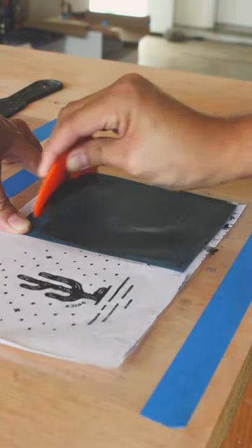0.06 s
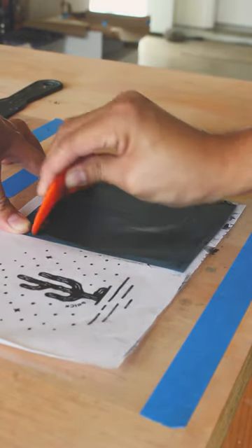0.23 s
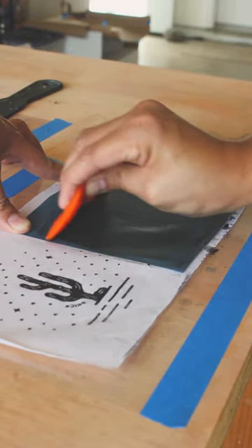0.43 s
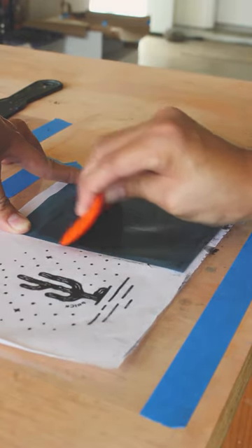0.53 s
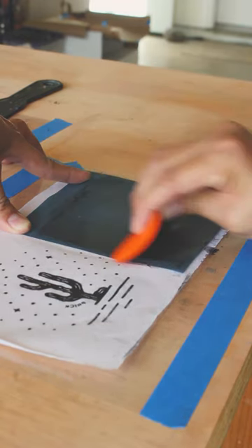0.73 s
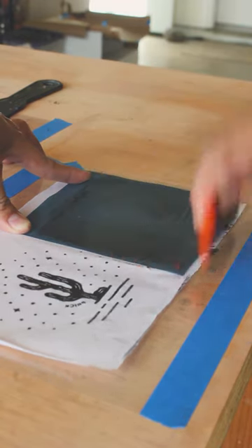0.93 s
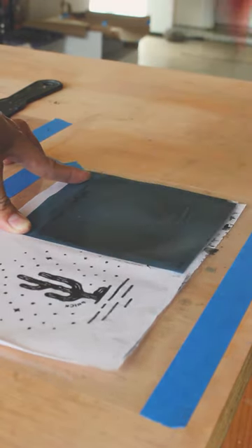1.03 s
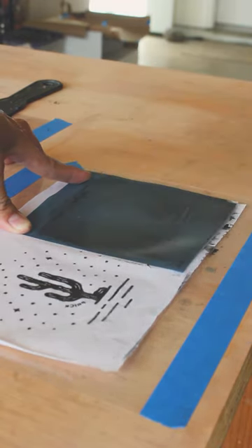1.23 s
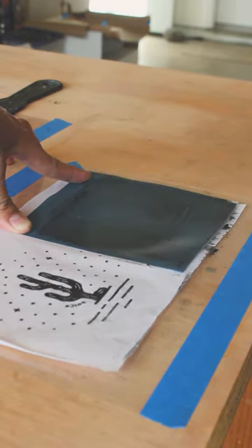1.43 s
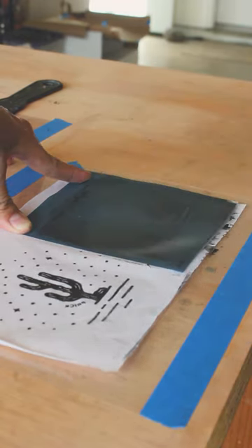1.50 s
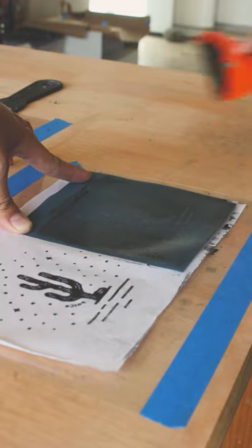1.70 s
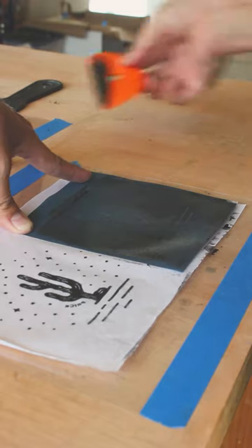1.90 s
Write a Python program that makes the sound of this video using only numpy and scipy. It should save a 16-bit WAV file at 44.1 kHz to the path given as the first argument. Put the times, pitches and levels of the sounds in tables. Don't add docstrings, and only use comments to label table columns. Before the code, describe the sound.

Short gritty scrape of a plastic blade over inky mesh, swelling to a tiny squeak and a hard wooden crack, heard close in a workshop with low hum, faint birdsong and later a small distant clatter.

```python
import sys
import numpy as np
from scipy import signal
from scipy.fft import rfft, irfft, next_fast_len
from scipy.io import wavfile
from scipy.ndimage import uniform_filter1d, map_coordinates

SR = 44100
rng = np.random.default_rng(int(sys.argv[2]) if len(sys.argv) > 2 else 0)


def nominal_scale(level):
    x = np.asarray(level, float) / 20
    return 10 ** x


def wrap_up_sound(samples):
    columns = np.atleast_2d(samples).T
    tamed = np.clip(columns, -1, 1)
    steps = np.round(tamed * 32767).astype(np.int16)
    wavfile.write(sys.argv[1], SR, steps)


N = 85995
SET_DOWN_S, LIFT_S = .2198, .9482

# t/s, level/dB
DRAG = [
    (.36, -71),
    (.462, -54),
    (.474, -47),
    (.49, -55),
    (.58, -48.5),
    (.68, -49),
    (.74, -44.5),
    (.925, -46.5),
    (.948, -38.5),
]
# f/Hz, level/dB per Hz
MESH = [(120, -41), (200, -8), (500, -8.5), (900, -1), (1500, 0.5), (3300, -1), (5000, -8), (8000, -44)]
# f/Hz, width/Hz, level/dB
BLADE = [(185, 25, -13), (828, 18, 1), (1014, 42, 4.5), (1104, 32, 15), (1763, 23, 6.5), (2050, 32, 10),
         (2520, 51, -16)]
# f/Hz, level/dB per Hz
FIZZ = [(2500, -24), (4500, -5), (7000, 6.5), (9000, 1.5), (12500, 6.5), (16000, 1)]
# f/Hz, level/dB per Hz
SLIDE = [(200, -53), (330, -3), (500, 0), (750, 0.5), (1000, -5), (1600, -45)]
# f/Hz, level/dB, t60/s
TABLE_HARD = [(177.4, -19.5, 0.36), (276, -29, 0.14), (384, -14, 0.14), (518, -12, 0.032),
              (622, -13.5, 0.073), (814, -13, 0.09), (966, -12.5, 0.046), (1416, -21, 0.11),
              (1717, -9.5, 0.026), (2368, -14, 0.038)]
# f/Hz, level/dB per Hz
CRACK = [(180, -41), (300, 4), (1010, 0), (1890, 4.5), (3490, 4.5), (5120, -8), (10300, -5.5), (14500, -43),
         (15800, -25)]
# f/Hz, level/dB, t60/s
SNAP = [(3550, -11, 0.0042), (990, -18, 0.014), (7140, -20.5, 0.0045)]
# f/Hz, level/dB per Hz
CLACK = [(100, -6.5), (200, -3.5), (400, -4), (817, -1), (1590, -11.5), (3880, -17.5), (5000, -24.5),
         (15800, -49)]
# f/Hz, level/dB, t60/s
TABLE_SOFT = [(156, -1, 0.19), (179, -2, 0.25), (240, -8.5, 0.11), (298.5, -3, .17), (380, -5.5, 0.086),
              (490, -8.5, 0.086), (593, -15, 0.078), (740, -10, 0.059), (1000, -21, 0.023)]
# f/Hz, level/dB per Hz
THUD = [(59, -33), (100, -11), (213, 22), (1160, -19), (1290, -37), (2500, -49), (3250, -74), (5500, -120)]
# t/s, peak level/dB, centre f/Hz
TICKS = [(.053, -52, 14000), (.219, -36, 7500), (.233, -46, 8000), (.2865, -50, 12000), (.356, -45, 9000),
         (.427, -48, 12000), (.474, -42, 10700), (.4995, -42.5, 7000), (.5305, -35, 8500),
         (.548, -45, 9000), (.561, -43, 12500), (.569, -37, 12000), (.622, -41, 12000), (.628, -40, 9000),
         (.634, -42, 12500), (.679, -42, 7000), (.742, -39, 13500), (.761, -42, 11000), (.782, -42, 8000),
         (.816, -38, 9000), (.835, -40, 14000), (.843, -37, 11500), (1.0172, -38, 13100),
         (1.023, -47, 13100), (1.062, -46, 12300), (1.1275, -44, 13000), (1.14, -48, 13000),
         (1.378, -51, 7000), (1.412, -46, 7000)]
# f/Hz, level/dB per Hz
CLATTER = [(200, -16), (400, -5), (708, -7), (1210, -6.5), (2260, -9), (3940, -13), (10500, -21),
           (12500, -26)]
# f/Hz, width/Hz, level/dB
CLATTER_RING = [(722, 105, -2.5), (1750, 60, -7), (2240, 50, -1), (3950, 260, -3), (4550, 120, -13),
                (5100, 160, -5)]
# t/s, half length/s, level/dB
RUSTLES = [
    (1.42, .035, -58),
    (1.572, .015, -59),
    (.285, .012, -62),
    (.095, .03, -63),
    (.185, .03, -62),
]
# f/Hz, level/dB per Hz
RUSTLE = [(700, -25), (1500, -34), (3300, 16), (6000, 2), (16000, -45)]
# t/s, length/s, from f/Hz, to f/Hz, level/dB
WHISTLES = [(.433, .03, 4280, 4290, -61), (.458, .036, 4290, 4260, -55), (.49, .036, 4270, 4250, -62),
            (.527, .044, 4310, 4230, -59), (.566, .05, 4230, 4110, -50), (.612, .058, 4085, 3995, -52),
            (.662, .056, 3998, 3930, -48), (1.08, .03, 4080, 4120, -68), (1.215, .035, 4170, 4220, -66),
            (1.275, .05, 4200, 4190, -63), (1.658, .045, 5200, 4750, -53), (1.69, .028, 5200, 4850, -55),
            (1.7, .022, 4780, 4520, -58), (1.718, .034, 4500, 4400, -61), (1.746, .022, 4400, 4380, -50),
            (1.775, .125, 4420, 4420, -67), (1.8, .03, 4170, 4120, -63), (1.836, .03, 4140, 4080, -62),
            (1.876, .026, 4030, 3930, -63), (1.904, .03, 3920, 3820, -63), (1.772, .026, 3560, 3330, -60),
            (1.8, .022, 3330, 3290, -66), (1.826, .056, 3270, 3120, -61), (1.715, .05, 5120, 5050, -69)]
# t/s, length/s, from f/Hz, to f/Hz, level/dB
CHIRPS = [(.072, .022, 3100, 3700, -60), (.16, .04, 3450, 3750, -66), (.256, .02, 3500, 3900, -55),
          (.272, .022, 2900, 2800, -60), (.356, .024, 3550, 4050, -54), (.385, .016, 3600, 3950, -58),
          (.478, .02, 3800, 3980, -55), (.493, .02, 3950, 3750, -51), (.515, .016, 3900, 3700, -55),
          (1.018, .02, 3350, 3720, -57), (1.036, .028, 3850, 4170, -51.5), (1.4, .025, 3900, 3100, -65),
          (1.425, .024, 4280, 4750, -53), (1.748, .02, 4150, 3850, -50), (1.762, .016, 3850, 3550, -60),
          (1.768, .014, 4050, 3900, -56), (.09, .016, 2950, 2800, -63), (.15, .022, 3250, 3350, -64),
          (.172, .02, 4500, 4500, -65), (.18, .024, 4850, 4850, -65), (1.56, .025, 5100, 5050, -70)]
# f/Hz, level/dB per Hz
HUM = [(15, -58), (25, -42), (54, 2.5), (172, 0), (206, -3.5), (243, -10), (317, -12), (400, -21.5),
       (520, -45), (880, -120)]
# f/Hz, level/dB per Hz
AIR = [(150, -26), (250, 1), (483, -3), (746, -4), (887, -1.5), (1470, -8.5), (1740, -10.5), (2040, -13),
       (15800, -24)]
# f/Hz, t60/s
NEAR_ROOM = [(200, 0.35), (1000, .25), (4000, 0.36), (15000, 0.24)]
# f/Hz, t60/s
FAR_ROOM = [(300, .17), (2000, .4), (6000, .36), (15000, .3)]


def drag():
    t = np.arange(N) / SR
    effort_db = np.interp(t, *np.transpose(DRAG), left=-120, right=-120)
    rub = mesh_grains()
    return blade_scrape(rub, effort_db) + ink_fizz(rub, effort_db) + squeak() + screen_creep(effort_db)


def mesh_grains(grains_per_s=5000, scatter_db=2.5, share=.5):
    hits = rng.random(N) < grains_per_s / SR
    strength = rng.standard_normal(N) * nominal_scale(scatter_db * rng.exponential(size=N))
    return np.sqrt(share) * unit(hits * strength) + np.sqrt(1 - share) * rng.standard_normal(N)


def blade_scrape(rub, effort_db):
    def colour(hz):
        return nominal_scale(along(MESH, hz)) * resonant(BLADE, hz)

    uneven = rub * nominal_scale(effort_db + 0.37 * wobble(25.8))
    return filtered(uneven, colour) / np.std(filtered(rub, colour))


def ink_fizz(rub, effort_db, level_db=-1.5, growth=1.6, patchy_db=1.8, fade_t60_s=.08):
    t = np.arange(N) / SR
    top_db = np.max(effort_db)
    trail_db = np.interp(t, *np.transpose(DRAG), left=-120)
    trail_db = trail_db - 60 * np.maximum(t - LIFT_S, 0) / fade_t60_s
    z = signal.stft(rub, nperseg=256)[2]
    patches = uniform_filter1d(rng.standard_normal(z.shape), 7, 0)
    patches = uniform_filter1d(patches, 9, 1)
    patchy = signal.istft(z * nominal_scale(patchy_db * unit(patches)), nperseg=256)[1][:N]
    return unit(coloured(patchy, FIZZ)) * nominal_scale(top_db + level_db + growth * (trail_db - top_db))


def squeak(length_s=.03, from_hz=1740, rise_hz=480, level_db=-40):
    t = np.arange(N) / SR
    u = np.clip((t - LIFT_S) / length_s + 1, 0, 1)
    phase = 2 * np.pi * np.cumsum(from_hz + rise_hz * u ** 3) / SR
    return nominal_scale(level_db + 0.88 * wobble(250)) * u * (u < 1) * np.sin(phase)


def screen_creep(effort_db, level_db=-15, growth=0.05, wobble_db=1.2):
    top_db = np.max(effort_db)
    creep = noise(SLIDE) * (effort_db > -119)
    return creep * nominal_scale(top_db + level_db + growth * (effort_db - top_db) + wobble_db * wobble(29.9))


def knocks():
    return snap_off() + set_down() + shudder()


def snap_off(knock_db=-15.5, crack_db=-20, clack_db=-1.5, delay_s=.0003, hold_s=.0002, crack_t60_s=.005):
    t = np.arange(2000) / SR
    crack = noise(CRACK, len(t)) * nominal_scale(crack_db - 60 * np.maximum(t - hold_s, 0) / crack_t60_s)
    knock = nominal_scale(knock_db) * placed(ring(TABLE_HARD, 0.74), LIFT_S)
    spring = placed(ring(SNAP, 0.28), LIFT_S + delay_s)
    clack = nominal_scale(clack_db) * answer(LIFT_S, CLACK, .001)
    return knock + placed(crack, LIFT_S + delay_s) + spring + clack


def set_down(knock_db=-30, thud_db=-27):
    knock = nominal_scale(knock_db) * placed(ring(TABLE_SOFT, 0.49), SET_DOWN_S)
    return knock + nominal_scale(thud_db) * answer(SET_DOWN_S, THUD, 0.00035)


def shudder(centre_s=.892, half_length_s=.028, f_hz=186, level_db=-41):
    t = np.arange(N) / SR
    swell = np.exp(-((t - centre_s) / half_length_s) ** 2)
    return nominal_scale(level_db) * swell * np.sin(2 * np.pi * f_hz * t)


def crackles(t60_s=.006, width_ratio=.93, gain=5.6):
    t = np.arange(600) / SR
    out = np.zeros(N)
    for s, db, centre_hz in TICKS:
        burst = rng.standard_normal(len(t)) * nominal_scale(-60 * t / t60_s)
        peak = [(centre_hz, centre_hz / width_ratio, 0)]
        tick = filtered(burst / np.linalg.norm(burst) * gain, lambda hz: (resonant(peak, hz) - 1) ** 2)
        out += nominal_scale(db) * placed(tick, s)
    return out


def clatter(start_s=1.5915, level_db=-40.5, second_s=0.014, second_db=-10, ring_db=6):
    blows = placed([1.], start_s) + placed([nominal_scale(second_db)], start_s + second_s)
    peaks = [(hz, width_hz, db + ring_db) for hz, width_hz, db in CLATTER_RING]
    wet = room(blows, FAR_ROOM, gap_s=0)
    wet = filtered(wet, lambda hz: nominal_scale(along(CLATTER, hz)) * resonant(peaks, hz))
    return nominal_scale(level_db) * wet / np.std(wet[round(start_s * SR):][:2000])


def rustle():
    t = np.arange(N) / SR
    swell = sum(nominal_scale(db) * np.exp(-((t - s) / half_s) ** 2) for s, half_s, db in RUSTLES)
    return swell * noise(RUSTLE)


def birds(flutter_db=1.5, rough_db=2, wet_db=-10):
    whistles = notes(WHISTLES) * nominal_scale(flutter_db * wobble(60.5))
    chirps = notes(CHIRPS) * nominal_scale(rough_db * wobble(300))
    song = whistles + chirps
    return song + nominal_scale(wet_db) * room(song, FAR_ROOM)


def notes(table, edge_s=.007):
    song = np.zeros(N)
    for s, length_s, from_hz, to_hz, db in table:
        t = np.arange(round(length_s * SR)) / SR
        edge = np.clip(np.minimum(t, length_s - t) / edge_s, 0, 1)
        phase = 2 * np.pi * np.cumsum(from_hz + (to_hz - from_hz) * t / length_s) / SR
        song += placed(np.sqrt(2) * nominal_scale(db) * edge * np.sin(phase), s)
    return song


def background(hum_db=-49.5, hum_wobble_db=.8, air_db=-52, air_drift_db=.6):
    hum, air = noise(HUM), noise(AIR)
    hum_level_db = hum_db + hum_wobble_db * wobble(2.9)
    air_level_db = air_db + air_drift_db * wobble(4.02) + 0.13 * wobble(13.0)
    return nominal_scale(hum_level_db) * hum + nominal_scale(air_level_db) * air


def answer(s, spectrum, gap_s):
    x = coloured(room(placed([1.], s), NEAR_ROOM, gap_s), spectrum)
    return x / np.linalg.norm(x)


def room(x, decay, gap_s=0.0044):
    hz, t, z = signal.stft(rng.standard_normal(SR // 2), SR, nperseg=128)
    fade = nominal_scale(-60 * t / along(decay, hz)[:, None])
    tail = signal.istft(z * fade, SR, nperseg=128)[1]
    return signal.fftconvolve(placed(x, gap_s), tail / np.linalg.norm(tail))[:N]


def ring(modes, attack_cycles):
    t = np.arange(SR // 2) / SR
    out = np.zeros(len(t))
    for k, (hz, db, t60_s) in enumerate(modes):
        attack = 1 - np.exp(-t * hz / attack_cycles)
        out += (-1) ** (k + 1) * nominal_scale(db - 60 * t / t60_s) * np.sin(2 * np.pi * hz * t) * attack
    return out


def resonant(peaks, hz):
    return 1 + sum(nominal_scale(db) * 1j * hz * w / (c * c - hz * hz + 1j * hz * w) for c, w, db in peaks)


def filtered(x, response):
    m = next_fast_len(N + SR // 2)
    return irfft(rfft(x, m) * response(np.fft.rfftfreq(m, 1 / SR)), m)[:len(x)]


def coloured(x, spectrum):
    return filtered(x, lambda hz: nominal_scale(along(spectrum, hz)))


def noise(spectrum, n=N):
    return unit(coloured(rng.standard_normal(n), spectrum))


def along(points, hz):
    f, v = np.transpose(points)
    return np.interp(np.log(hz + 1), np.log(f + 1), v)


def wobble(rate_hz):
    knots = rng.standard_normal(int(N * rate_hz / SR) + 4)
    return map_coordinates(knots, [np.arange(N) * rate_hz / SR])


def placed(x, s):
    return np.pad(x, (round(s * SR), N))[:N]


def unit(x):
    return x / np.sqrt(np.mean(x ** 2) + 1e-20)


def scene():
    rub = drag()
    table = rub + nominal_scale(-10) * room(rub, NEAR_ROOM) + crackles() + knocks()
    return (table + clatter() + birds() + background() + rustle())[None]


def low_pass(x):
    return signal.sosfilt(signal.butter(12, 16280, fs=SR, output="sos"), x)


def record(dry):
    low_hz, top_hz = 45, 15800
    heard = filtered(dry[0], lambda hz: (hz < top_hz) * (1j * hz / (low_hz + 1j * hz)) ** 2)
    return low_pass(heard[None])


dry = scene()
out = record(dry)
wrap_up_sound(out)
```